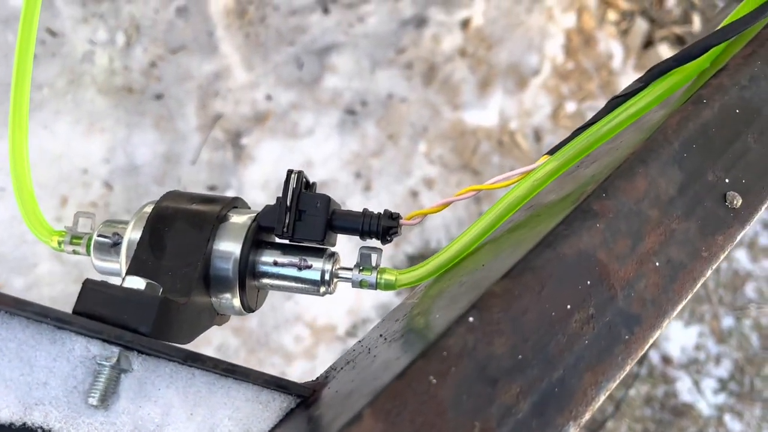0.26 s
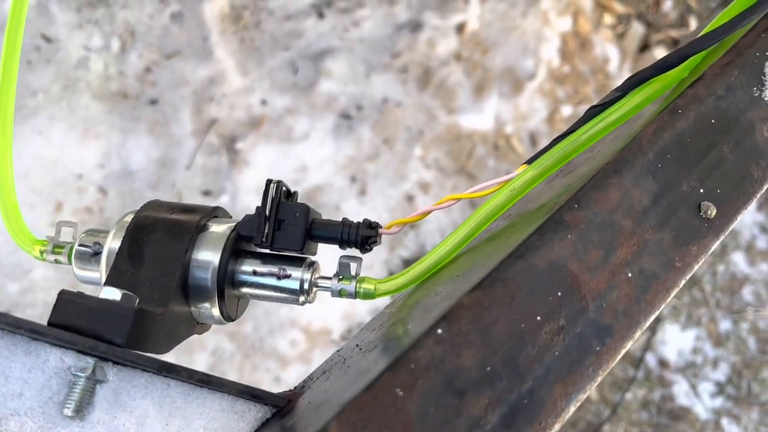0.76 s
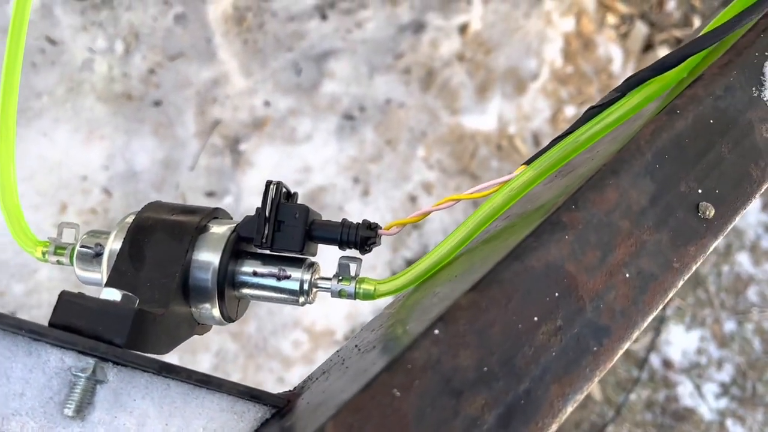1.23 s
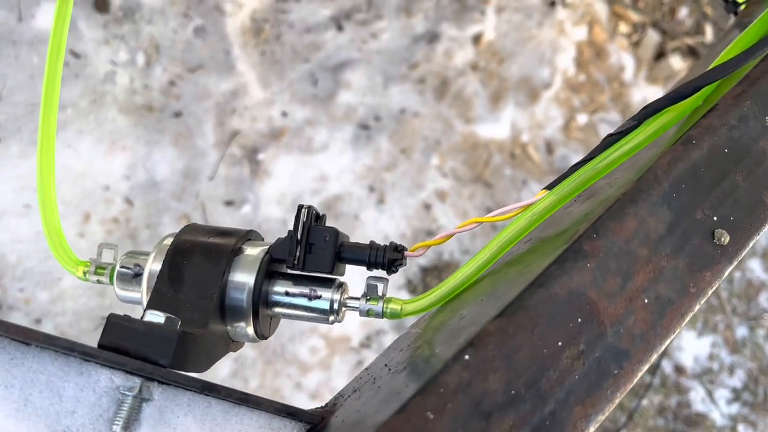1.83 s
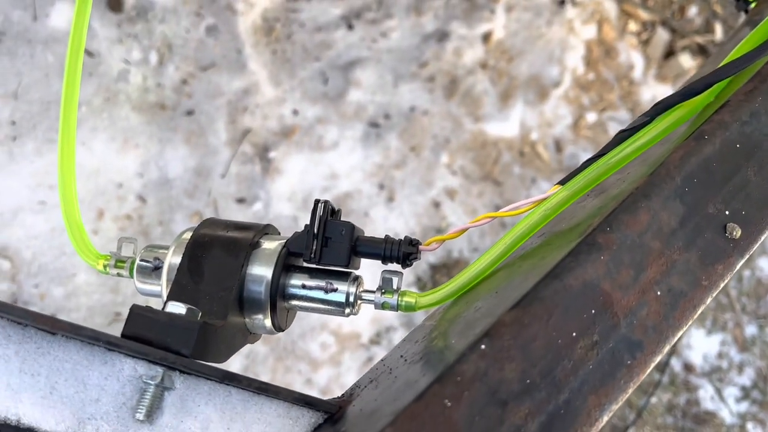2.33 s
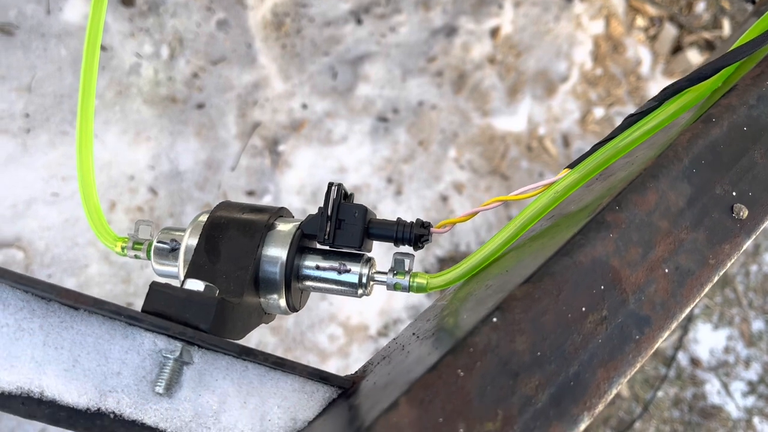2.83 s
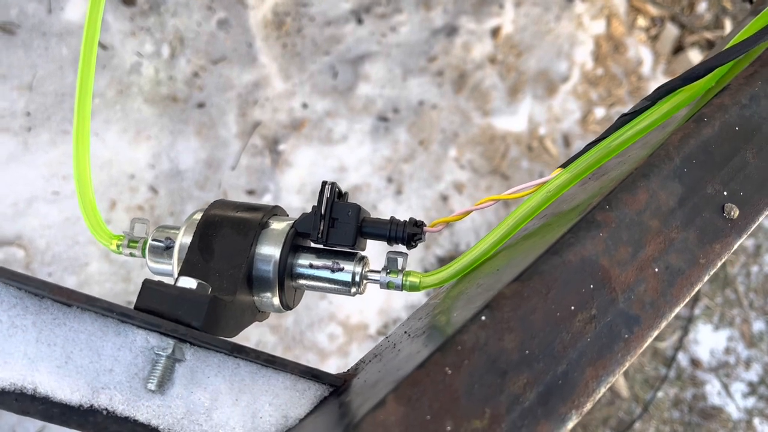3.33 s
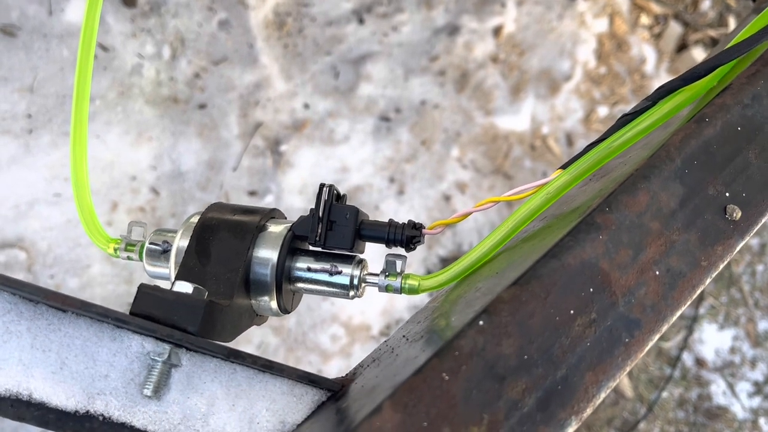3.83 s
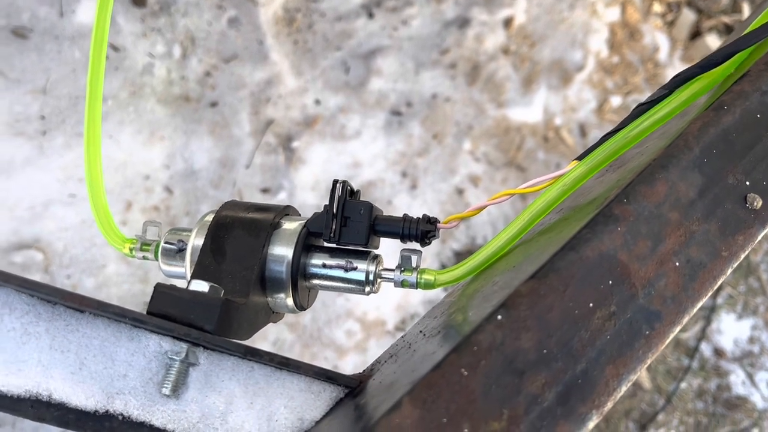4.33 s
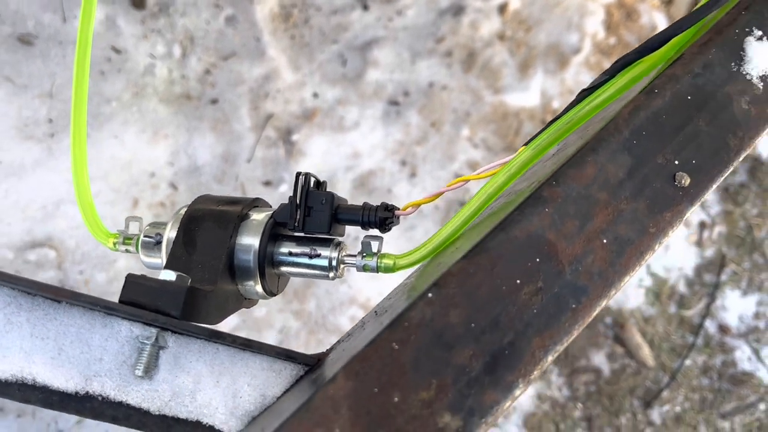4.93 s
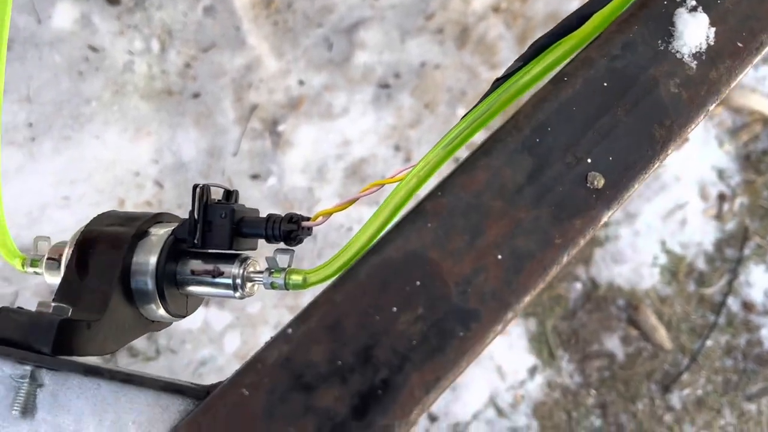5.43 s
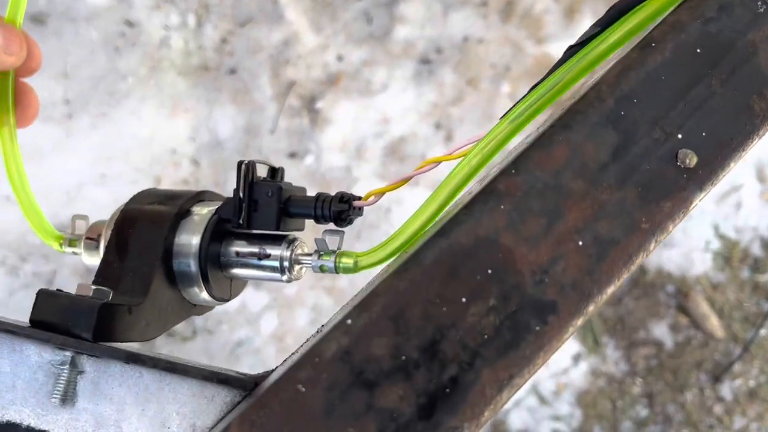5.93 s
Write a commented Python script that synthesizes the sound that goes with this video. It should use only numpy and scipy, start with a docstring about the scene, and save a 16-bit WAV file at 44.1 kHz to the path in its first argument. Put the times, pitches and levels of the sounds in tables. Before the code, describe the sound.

Close, bright double clicks of a solenoid pump repeat about every 0.7 seconds over a near-silent yard, with a brief boot creak near the end.

```python
"""A solenoid fuel pump on a steel frame ticks outdoors: struck modes and contact noise as its plunger slams in,
springs back 37 ms later and bounces each time. The frame rings faintly as decaying sines; a noise tail gives the yard's echo.
Near the end filtered noise makes a sleeve rustle, and noise with squeaks a boot creak in the snow, as someone reaches
for the fuel hose. Sagging low tones are bumps of a hand on the microphones; small ticks come from hose and wires.
Behind lie echoed whistles of far birds, a soft far rush, low air rumble and a hum of noise and wavering tones."""
import sys
import numpy as np
from scipy import signal
from scipy.fft import rfft, irfft, next_fast_len
from scipy.io import wavfile
from scipy.ndimage import map_coordinates

SR = 44100
rng = np.random.default_rng(int(sys.argv[2]) if len(sys.argv) > 2 else 0)


def log_audio(samples):
    """Write samples as a 16-bit WAV file to the path given in sys.argv[1]."""
    # one column per channel
    frames = np.atleast_2d(samples).T
    # limit to full scale, then quantise
    limited = np.clip(frames, -1, 1)
    pcm = np.round(limited * 32767).astype(np.int16)
    wavfile.write(sys.argv[1], SR, pcm)


N = 271656  # length in samples


def amp(db):
    """Amplitude ratio: 20 dB is a factor of ten."""
    return 10 ** (np.asarray(db) / 20)


def unit(x):
    """Normalisation to an rms value of 1."""
    return x / np.sqrt(np.mean(x ** 2) + 1e-20)


def along(points, hz):
    """Interpolation of (frequency_hz, value) points on a logarithmic frequency axis."""
    f, v = np.transpose(points)
    return np.interp(np.log(hz + 1), np.log(f + 1), v)


def curves(rows):
    """Linear interpolation in time: one value per sample for each column after the time."""
    s, *columns = np.transpose(rows)
    return [np.interp(np.arange(N) / SR, s, column) for column in columns]


def wobble(rate):
    """Random modulation: a smooth curve through rate random knots a second."""
    knots = rng.standard_normal(int(N * rate / SR) + 4)
    return map_coordinates(knots, [np.arange(N) * rate / SR])


def filtered(x, response):
    """Linear filtering: the spectrum of x times a response of frequency."""
    m = next_fast_len(x.shape[-1] + SR // 10)
    spectrum = rfft(x, m) * response(np.fft.rfftfreq(m, 1 / SR))
    return irfft(spectrum, m)[..., :x.shape[-1]]


def noise(spectrum, alike, size=N):
    """Partly coherent stereo noise of rms 1; alike sets the correlation of left and right."""
    mid, side = filtered(rng.standard_normal((2, size)), lambda hz: amp(along(spectrum, hz)))
    turn = np.arccos(np.clip(alike, 0, 1)) / 2
    return unit(np.cos(turn) * mid + np.sin(turn) * np.array([side, -side]))


def panned(db):
    """Interaural level difference: left and right gains db apart."""
    return amp([[db / 2], [-db / 2]])


def fade(t, attack, t60):
    """Exponential decay by 60 dB in t60 after a quick rise, silent before t = 0."""
    t = np.maximum(t, 0)
    return (1 - np.exp(-t / attack)) * np.exp(-np.log(1000) * t / t60)


def add(track, s, sound):
    """Superposition: mix a sound into the track at s seconds."""
    part = track[:, max(round(s * SR), 0):][:, :sound.shape[-1]]
    part += sound[..., :part.shape[1]]


def scattered(from_s, to_s, db, count):
    """Stratified random events: one (start_s, level_db) in each equal slot, within 5 dB of db."""
    place, size = rng.random((count, 2)).T
    start_s = from_s + (to_s - from_s) * (np.arange(count) + place) / count
    return np.transpose([start_s, db + 10 * (size - .5)])


# strokes of the pump, timed where the plunger hits its stop: start_s, level_db, left_over_right_db
STROKES = [(0.0728, -7, 3), (0.7868, -8, 3), (1.4997, -8, 3.5), (2.214, -10, 4), (2.9295, -10, 4),
           (3.6414, -9, 3), (4.3109, -8, 3), (4.9767, -9, 3), (5.643, -5, 2.5)]
# the coil lets go after a set time and the spring throws the plunger back at one fixed level
RETURN_AFTER_S, RETURN_DB, RETURN_SIDE_DB = .0369, -15, 2.5


def landings():
    """Driven pull and spring return: both blows of every stroke, as rows like STROKES."""
    returns = [(s + RETURN_AFTER_S, RETURN_DB, RETURN_SIDE_DB) for s, _, _ in STROKES]
    return STROKES, returns


# modes of the pump body: pitch_hz, t60_s, pull_level_db, return_level_db, left_over_right_db
BODY = [(1087, .009, -12.5, -7, -0.5), (1427, 0.0074, -7, 0, -9.5), (1950, 0.018, -24.5, -10, 5.5),
        (2450, 0.023, -28.5, -14.5, 1), (2564, 0.0055, -34.5, -11.5, 1.5), (2885, 0.014, -33, -10, 4),
        (3247, 0.0041, -29.5, -10, 9.5), (4350, 0.0047, -5, -21.5, 2.5), (4740, 0.0071, -13, -12, 3),
        (5232, 0.0054, 4, -15, 1), (5621, 0.023, -8.5, -23, -0.5), (6930, 0.0065, -14.5, -22.5, -4.5),
        (9490, 0.0092, -18.5, -26, -5), (10430, 0.01, -18, -26, -4.5), (11430, .006, -10, -25, -1),
        (13800, .005, -12.5, -26, -4.5)]
# spread of each mode from contact to contact: strength (dB) and pitch (share)
STROKE_SCATTER_DB, STROKE_STRAY = 1.5, .006


def body_ring(t, mode_db, attack):
    """Modal synthesis: a contact excites damped sines, each with its own left-right balance."""
    ring = np.zeros((2, len(t)))
    for k, ((hz, t60, _, _, side_db), db) in enumerate(zip(BODY, mode_db)):
        strength = amp(db + STROKE_SCATTER_DB * rng.standard_normal()) * panned(side_db)
        pitch = hz * (1 + STROKE_STRAY * rng.standard_normal())
        polarity = (-1) ** k
        ring += polarity * strength * np.sin(2 * np.pi * pitch * t) * fade(t, attack, t60)
    return ring


# chatter of the hose clamps and bracket: frequency_hz, level_db_per_hz
CLAMPS = [(150, -12), (600, 0.5), (1200, -1), (1850, 3), (2250, -4.5), (2800, 0), (4000, -13.5),
          (5300, -7.5), (6500, -18.5), (8500, -27), (11500, -26.5), (16000, -39.5)]
CONTACT_RISE_S = .0002  # build-up of the contact noise
GRIP_S = 5.55  # the moment when fingers close on the hose


def blows(events, mode_db, crack_colour, attack, ring_db, crack_db, crack_t60,
          bounce, chatter_db, chatter_t60, grip_db):
    """Impact and rebound: the plunger lands, bounces once and sets the clamps chattering."""
    track, t = np.zeros((2, N)), np.arange(SR // 10) / SR
    bounce_s, bounce_db = bounce
    # grain shared by all strokes, so that they sound nearly alike
    grit = noise(crack_colour, alike=0.87, size=len(t))
    for s, db, side_db in events:
        late = t - bounce_s * (1 + 0.025 * rng.standard_normal())
        ring = body_ring(t, mode_db, attack) + amp(bounce_db) * body_ring(late, mode_db, attack)
        ring *= amp(ring_db + grip_db * (s > GRIP_S))  # the grip alters the ring
        first = fade(t, CONTACT_RISE_S, crack_t60)
        rebound = amp(bounce_db) * fade(late, CONTACT_RISE_S, crack_t60)
        fresh = noise(crack_colour, alike=1.0, size=len(t))
        crack = amp(crack_db) * (first + rebound) * unit(grit + 0.59 * fresh)
        rattle = noise(CLAMPS, alike=0.28, size=len(t))
        chatter = amp(chatter_db) * fade(t, 0.0032, chatter_t60) * rattle
        add(track, s, amp(db) * panned(side_db) * (ring + crack + chatter))
    return track


# contact noise of the two blows: frequency_hz, level_db_per_hz
PULL_CRACK = [(100, -21.5), (600, -10.5), (1200, -0.5), (3000, -4.5), (5200, 2.5), (7000, 2), (8500, -7.5),
              (11500, -4.5), (13800, -7.5), (15200, -19), (16500, -26.5)]
RETURN_CRACK = [(100, -14), (600, -11.5), (1200, 5), (3000, 4), (4100, -2), (5300, -2), (8300, -19),
                (11000, -22.5), (14000, -21), (16500, -27.5)]
# phase of the left channel ahead of the right: frequency_hz, lead_rad
LEAD = [(300, 4), (1100, 0), (1500, 3.5), (1900, 0.78), (3000, 1.29), (5000, 0.5), (5600, 2), (7500, -2.5),
        (11400, -6), (16000, -9.5)]
# the plunger's rebound after each blow: delay_s, level_db
PULL_BOUNCE, RETURN_BOUNCE = (.0039, -7), (.0074, -6)
PULL_RISE_S, RETURN_RISE_S = .0008, .0001  # build-up of the body's ring


def pump():
    """Spectrum follows excitation: a bright tick as the coil pulls, a duller tock as the spring returns."""
    _, _, pull_db, return_db, _ = np.transpose(BODY)
    pulls, returns = landings()
    # the grip damps the tick and leaves the tock almost unchanged
    tick = blows(pulls, pull_db, PULL_CRACK, attack=PULL_RISE_S, ring_db=2.5,
                 crack_db=-11.5, crack_t60=0.015, bounce=PULL_BOUNCE,
                 chatter_db=-29.0, chatter_t60=0.14, grip_db=-4.5)
    tock = blows(returns, return_db, RETURN_CRACK, attack=RETURN_RISE_S, ring_db=-0.5,
                 crack_db=-8, crack_t60=0.012, bounce=RETURN_BOUNCE,
                 chatter_db=-17.5, chatter_t60=.09, grip_db=0.5)
    # half the phase difference goes to each side
    return filtered(tick + tock, lambda hz: np.exp(.5j * along(LEAD, hz) * [[1], [-1]]))


# modes of the steel frame under the pump: pitch_hz, level_db, t60_s
FRAME = [(129.7, -9, 0.58), (260.1, -10, 0.33), (953, -19, 0.44), (1097, -17.5, 0.23), (1643.4, -3, 0.077),
         (1810, 13, 0.1), (1854, -7.5, 0.27), (2220, -2.5, .15), (2400, -9.5, .19), (2534, -6, 0.09),
         (2544, -6, 0.077), (2660, -5, 0.13), (2737, -12, 0.16), (3295, -23, 0.12)]
# spread of the loose frame's modes from blow to blow: pitch (share) and strength (dB)
FRAME_STRAY, FRAME_SCATTER_DB = .01, 3


def frame(pull_db, return_db):
    """Structure-borne sound: every blow leaks through the rubber mount and rings the frame's modes."""
    track, t = np.zeros((2, N)), np.arange(SR // 3) / SR
    hz, mode_db, t60 = np.transpose(FRAME)[:, :, None]
    decays = amp(mode_db) * fade(t, 0.008, t60)
    for events, leak_db in zip(landings(), (pull_db, return_db)):
        for s, db, _ in events:
            pitch = hz * (1 + FRAME_STRAY * rng.standard_normal(hz.shape))
            modes = decays * np.sin(2 * np.pi * pitch * t)
            scatter_db = FRAME_SCATTER_DB * rng.standard_normal((2, len(FRAME)))
            add(track, s, amp(db + leak_db + scatter_db) @ modes)
    return track


# decay of the yard's echo: frequency_hz, t60_s
YARD_T60 = [(200, 2.5), (1200, 0.5144), (2800, 0.3641), (5500, 0.79), (12000, 0.9)]
# colour of the yard's echo: frequency_hz, level_db
YARD_COLOUR = [(200, 7), (1200, 4), (2700, 5), (5400, -18.5), (8000, -14.5), (12000, -13.5)]


def yard(x):
    """Diffuse reverberation: scattered echoes as noise whose decay time depends on frequency."""
    hz, t, z = signal.stft(rng.standard_normal((2, SR // 2)), SR, nperseg=256)
    decay = fade(t, 0.01, along(YARD_T60, hz)[:, None])
    _, tail = signal.istft(z * decay, SR, nperseg=256)
    tail = filtered(tail / np.linalg.norm(tail[0]), lambda f: amp(along(YARD_COLOUR, f)))
    return signal.fftconvolve(x, tail, axes=1)[:, :N]


# hard slips of the boot on packed snow: start_s, level_db, t60_s
CREAKS = [(5.311, -27, .035), (5.335, -29, .03), (5.352, -27, 0.023), (5.368, -29, 0.043),
          (5.403, -33, 0.051), (5.435, -26.5, 0.044)]
# crunch of the snow: frequency_hz, level_db_per_hz
SNOW = [(180, -31), (300, -5), (637, -13.5), (898, 2), (1210, -1), (2650, -17.5), (5260, -32),
        (7920, -47.5), (9960, -28.5), (12900, -36.5), (15000, -46.5)]
# further slips fill the time while the weight comes on; SLIP_DB is their middle level
TREAD_FROM_S, TREAD_TO_S, SLIP_DB, SLIP_T60_S = 5.25, 5.41, -34.5, 0.026


def creak(attack, squeak_hz, squeak_db):
    """Stick-slip: packed snow gives way in uneven slips, each a short squeak in crunchy noise."""
    t = np.arange(N) / SR
    crunch, track = noise(SNOW, alike=0.71), np.zeros((2, N))
    filling = scattered(TREAD_FROM_S, TREAD_TO_S, SLIP_DB, count=10)
    slips = list(CREAKS) + [(s, db, SLIP_T60_S) for s, db in filling]
    for s, db, t60 in slips:
        pitch = squeak_hz * (1 + 0.059 * rng.standard_normal())
        squeak = np.sin(2 * np.pi * pitch * (t - s))
        track += amp(db) * fade(t - s, attack, t60) * (crunch + amp(squeak_db) * squeak)
    return track


# slides of the sleeve as the arm reaches out: start_s, length_s, final_level_db
SLIDES = [(4.75, 0.12, -54.5), (4.985, 0.42, -47.5), (5.574, .45, -63)]
# jacket cloth: frequency_hz, level_db_per_hz
CLOTH = [(120, -4.5), (250, -11), (800, -7), (1600, -4), (2400, -11), (5100, -8.5), (7100, -17),
         (8700, -40), (10000, -15.5), (13800, -17.5), (15500, -44.5)]
# a slide starts softly, grows as the arm speeds up and dies away when it stops
SLIDE_ATTACK_S, SLIDE_SWELL_DB_PER_S, SLIDE_RELEASE_T60_S = 0.062, 23, 0.59


def sleeve(grain_db, uneven_db):
    """Friction noise: jacket cloth slides over itself unevenly, with a fine grain."""
    t, rubbing = np.arange(N) / SR, np.zeros(N)
    for s, length, db in SLIDES:
        to_go = s + length - t
        onset = np.clip((t - s) / SLIDE_ATTACK_S, 0, 1)
        swell = amp(db - SLIDE_SWELL_DB_PER_S * np.clip(to_go, 0, length))
        release = np.exp(np.log(1000) * np.minimum(to_go, 0) / SLIDE_RELEASE_T60_S)
        rubbing += onset * swell * release
    texture_db = grain_db * wobble(210) + uneven_db * wobble(14)
    return rubbing * unit(noise(CLOTH, alike=0.13) * amp(texture_db))


# firm bumps of the hand on the microphones: start_s, level_db, nominal_pitch_hz
BUMPS = [(2.414, -29, 72.5), (2.44, -29, 92), (2.601, -25, 94), (2.853, -39, 77), (3.191, -34.5, 57.2),
         (3.804, -31, 106), (4.085, -24.5, 76.4), (4.678, -39, 78), (5.322, -20, 250), (5.603, -41, 600),
         (5.616, -30.5, 377)]
# in between, the fingers shift their grip in light nudges; NUDGE_DB is their middle level
FIDGET_FROM_S, FIDGET_TO_S, NUDGE_DB, NUDGE_HZ = 2.0, 4.8, -43.5, 70


def bumps(cycles, sag):
    """Damped oscillation: knocks and nudges as a few cycles whose pitch sags; cycles is the 60 dB decay."""
    track, t = np.zeros((2, N)), np.arange(SR // 5) / SR
    light = scattered(FIDGET_FROM_S, FIDGET_TO_S, NUDGE_DB, count=14)
    nudges = [(s, db, NUDGE_HZ) for s, db in light]
    for s, db, hz in list(BUMPS) + nudges:
        turns = t * hz  # time in nominal cycles
        pitch = hz * (0.89 + sag * np.exp(-turns / 0.29))
        phase = 2 * np.pi * np.cumsum(pitch) / SR
        add(track, s, amp(db) * np.sin(phase) * fade(turns, 0.42, cycles))
    return track


# small ticks and scuffs of hose and wires: start_s, level_db, t60_s, plug_knock_over_scuff_db
TICKS = [(.253, -64, 0.12, -14.5), (.278, -57.5, 0.14, -15.5), (0.625, -63.5, 0.11, -14.5),
         (.752, -57, 0.028, -20.5), (1.048, -68.5, 0.041, 2), (1.372, -68.5, 0.23, -15.5),
         (3.395, -61, 0.024, 9.5), (5.967, -38.5, 0.017, -9.5)]
# the scuff: frequency_hz, level_db_per_hz
TICK_COLOUR = [(400, -28), (1500, 5.5), (3000, 7.5), (7000, -3.5), (8500, -19.5), (12000, -10),
               (16000, -26)]
# the knock of the plastic plug: frequency_hz, level_db_per_hz
PLUG = [(2000, -30.5), (2700, -0.5), (3300, -0.5), (4200, -29)]


def ticks():
    """Transient contact noise: hose and wires shift against the frame; in a few the plug's knock dominates."""
    t, track = np.arange(N) / SR, np.zeros((2, N))
    scuff, knock = noise(TICK_COLOUR, alike=1.0), noise(PLUG, alike=.8)
    for s, db, t60, knock_db in TICKS:
        track += amp(db) * fade(t - s, 0.00085, t60) * (scuff + amp(knock_db) * knock)
    return track


# phrases of four notes: start_s, time_to_last_note_s, first_pitch_hz, last_pitch_hz, level_db
# (pitches before the scatter, scoop and warble)
PHRASES = [(0.0, 0.2, 7470, 5595, -68.5), (0.409, 0.47, 3664, 3846, -71), (1.4, 0.23, 6460, 6220, -74),
           (1.847, .26, 8170, 8080, -83), (3.015, .33, 7580, 5470, -70.5)]
NOTE_S, NOTE_SCATTER = .08, .025  # length of a note; spread of its pitch (share)
FAR_T60_S = .35  # the birds' echo among the trees


def bird(scoop, echo_t60):
    """Frequency modulation and scattering: warbling runs in widening pitch steps, heard only as echoes."""
    track, t = np.zeros((2, N)), np.arange(SR // 4) / SR
    shape = np.sin(np.pi * np.minimum(t / NOTE_S, 1))
    for s, length, first_hz, last_hz, db in PHRASES:
        warble = .02 * wobble(160)
        stray = 1 + NOTE_SCATTER * rng.standard_normal(4)
        for progress, off in zip(np.linspace(0, 1, len(stray)), stray):
            after = progress * length
            hz = off * (first_hz + (last_hz - first_hz) * progress ** 2)
            # each note scoops up from below
            bend = 1 - scoop * np.exp(-3 * t / NOTE_S) + warble[round(after * SR):][:len(t)]
            whistle = np.sin(2 * np.pi * np.cumsum(hz * bend) / SR)
            add(track, s + after, amp(db) * shape * whistle)
    echoes = rng.standard_normal((2, len(t))) * fade(t, .002, echo_t60)
    return signal.fftconvolve(track, echoes / np.linalg.norm(echoes[0]), axes=1)[:, :N]


# swells of a soft far rush: start_s, length_s, top_level_db
SWELLS = [(3.596, 0.44, -65.5), (4.249, 2.2, -66.5)]
# colour of the rush: frequency_hz, level_db_per_hz
WASH_COLOUR = [(300, -9), (800, -5.5), (1350, -4), (1900, -24), (5000, -52)]


def wash():
    """Amplitude-modulated noise: a dull, distant rush comes and goes in the second half."""
    t, level = np.arange(N) / SR, np.zeros(N)
    for s, length, db in SWELLS:
        arch = np.sin(np.pi * np.clip((t - s) / length, 0, 1))
        level += amp(db) * np.sqrt(np.abs(arch))
    return level * noise(WASH_COLOUR, alike=0.54)


# course of the air rumble, before its offset and flutter: time_s, level_db
AIR = [(0.0, -61), (1.25, -72), (2.56, -53.5), (2.8, -62), (4.05, -58), (6.16, -63)]
# colour of the rumble: frequency_hz, level_db_per_hz
RUMBLE = [(12, -44), (20, -18.5), (54, 1), (75, 1), (208, -15), (323, -25), (400, -21), (520, -57.5),
          (880, -120)]
GUST_DB, GUSTS_PER_S = 4.5, 12  # depth and pace of the rumble's flutter
# course of the hum, with the sleeve's low rub swelling near 5.3 s, before its offset: time_s, level_db
HUM_AND_RUB = [(0.0, -67.5), (1.11, -70), (4.97, -66), (5.3, -59), (6.16, -66.5)]
# colour shared by the hum and the low rub: frequency_hz, level_db_per_hz
HUM = [(120, -28.5), (200, -11), (456, -20.5), (519, -11), (590, -25), (722, -14), (851, -30), (1210, -27),
       (1840, -49.5), (3250, -45), (5420, -51), (6880, -49.5), (8740, -66), (11500, -53), (16000, -70.5)]
# tones in the hum, before their offset and wavering: pitch_hz, level_db
HUM_LINES = [(490, -77.5), (511, -75), (725, -81)]


def background(rumble_db, hum_db, lines_db):
    """Broadband and tonal noise: light air, a faint machine hum with wavering tones, the sleeve's low rub."""
    (air_db,), (hum_and_rub_db,) = curves(AIR), curves(HUM_AND_RUB)
    t = np.arange(N) / SR
    gusts_db = GUST_DB * wobble(GUSTS_PER_S)
    rumble = amp(air_db + rumble_db + gusts_db) * noise(RUMBLE, alike=.88)
    hum_and_rub = amp(hum_and_rub_db + hum_db) * noise(HUM, alike=0.6)
    lines = np.zeros(N)
    for hz, db in HUM_LINES:
        strength = amp(db + lines_db + 3.3 * wobble(6.5))
        lines += strength * np.sin(2 * np.pi * hz * t + 2.4 * wobble(12))
    return rumble + hum_and_rub + lines


def scene():
    """Superposition of sources: pump and frame in the yard, the person beside them, the outdoors behind."""
    ticking = pump() + frame(pull_db=-39.5, return_db=-28.5)
    near = ticking + creak(attack=0.0016, squeak_hz=1097, squeak_db=-2.5) + ticks()
    person = bumps(cycles=8.1, sag=2.94) + sleeve(grain_db=1.5, uneven_db=1)
    outdoors = background(rumble_db=1.5, hum_db=4, lines_db=-0.5)
    outdoors = outdoors + wash() + bird(scoop=.06, echo_t60=FAR_T60_S)
    return near + amp(-26.5) * yard(near) + person + outdoors


TOP_HZ = 16650  # upper band limit


def record(dry):
    """Band limiting: nothing at or above TOP_HZ passes."""
    return filtered(dry, lambda hz: hz < TOP_HZ)


dry = scene()
out = record(dry)
log_audio(out)
```